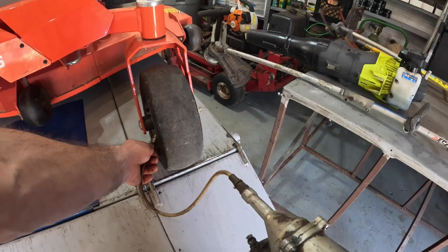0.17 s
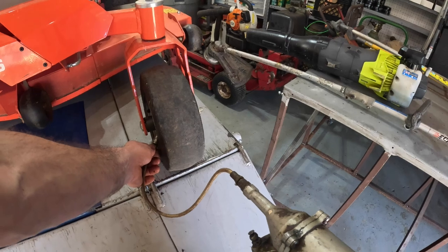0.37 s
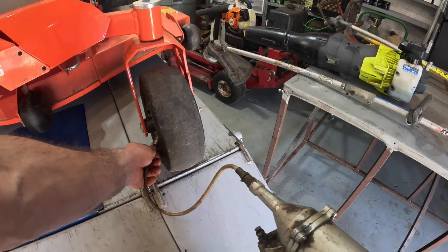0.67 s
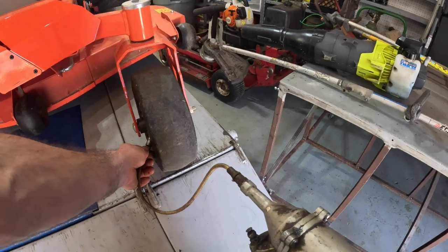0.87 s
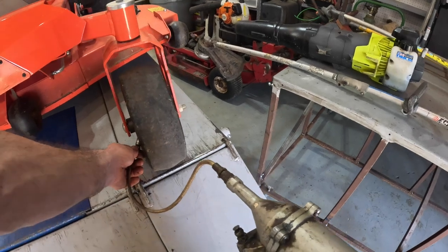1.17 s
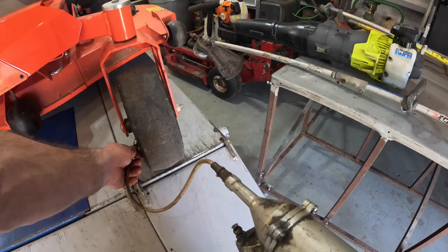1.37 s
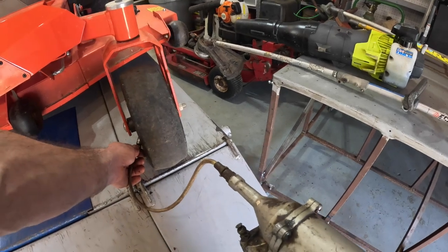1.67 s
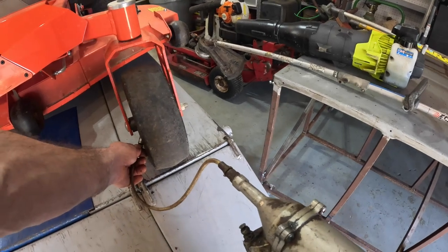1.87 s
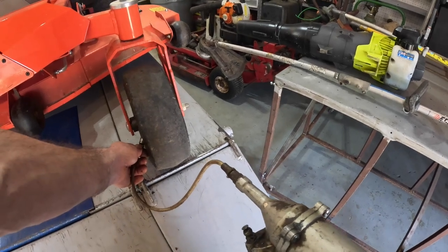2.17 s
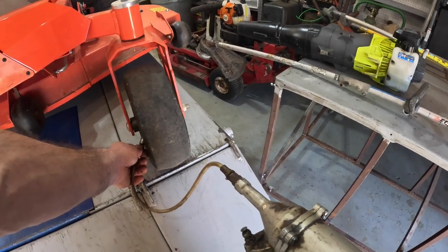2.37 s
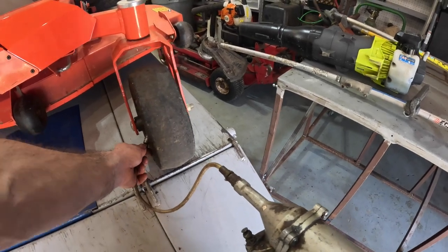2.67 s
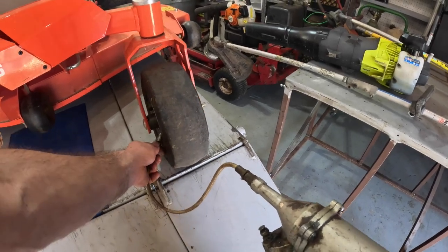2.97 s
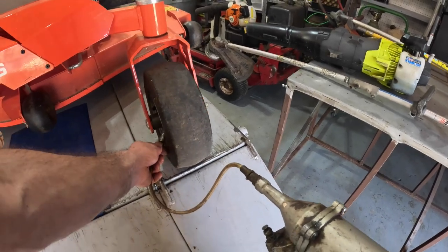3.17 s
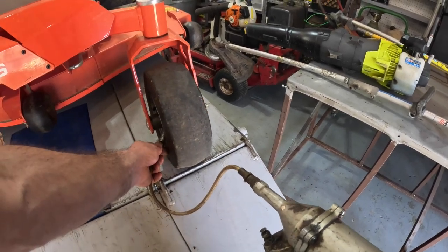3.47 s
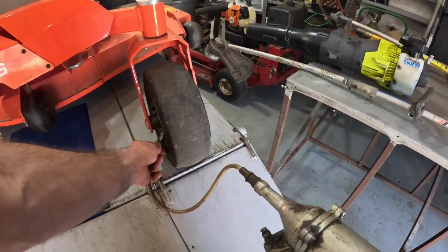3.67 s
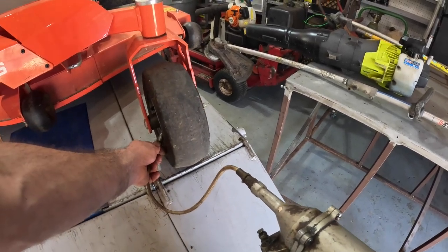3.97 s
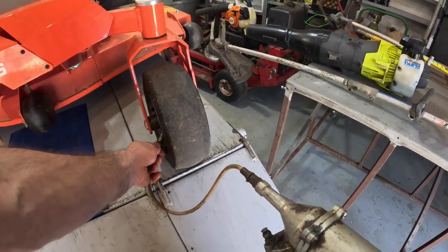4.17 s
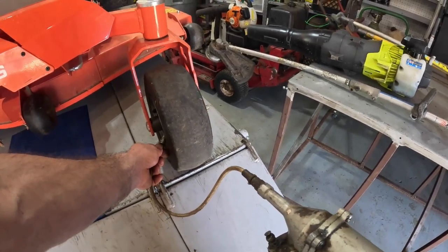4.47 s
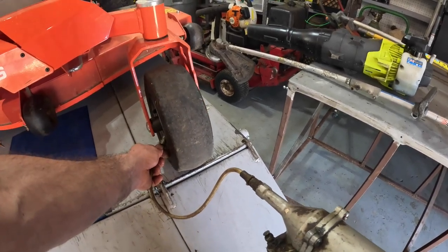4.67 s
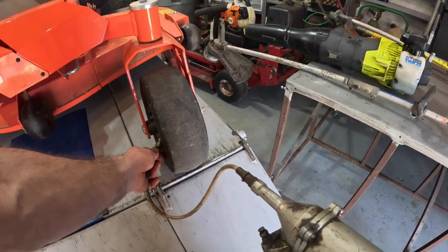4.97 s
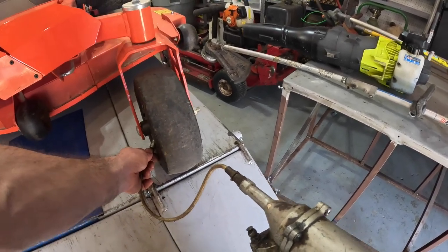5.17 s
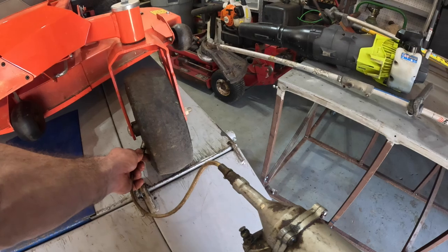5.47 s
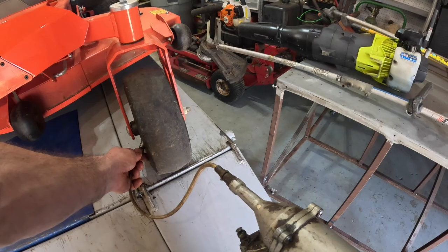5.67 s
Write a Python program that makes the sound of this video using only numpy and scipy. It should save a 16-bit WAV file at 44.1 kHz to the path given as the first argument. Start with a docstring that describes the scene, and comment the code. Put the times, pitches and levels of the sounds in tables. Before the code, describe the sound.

A pneumatic grease gun cycles about every 0.9 seconds very near the microphone. A tight clack as the piston slams home is followed roughly a third of a second later by a knocking pop and a bright, resonant hiss, sinking as pressure drops. Between strokes there is only a soft, uneven low rumble and distant motor drone. The shop adds a brief diffuse echo; the image is almost mono.

```python
"""Air-driven grease gun in a repair shop

Seven trigger pulls close by: air noise swells until the piston slams home on ringing body modes.
Each release pops and booms, then vents a resonant hiss that falls and dulls with the cylinder pressure.
The shop answers with a short echo of decaying noise, over a low rumble
built from filtered noise and a wavering motor tone."""
import sys
import numpy as np
from scipy import signal
from scipy.fft import rfft, irfft
from scipy.io import wavfile
from scipy.ndimage import uniform_filter1d

SR = 44100
rng = np.random.default_rng(int(sys.argv[2]) if len(sys.argv) > 2 else 0)


def dump_mix(stems):
    """Bounce the given channels to the path in sys.argv[1] as a 16-bit WAV at rate SR."""
    frames = np.atleast_2d(stems).T  # one column per channel
    limited = np.clip(frames, -1, 1)  # hard clip at full scale
    pcm = np.round(limited * 32767).astype(np.int16)
    wavfile.write(sys.argv[1], SR, pcm)


def field_ratio(decibels):
    """Amplitude ratio for a level in dB (20 dB per decade); scalars and array-likes work."""
    return 10 ** (np.asarray(decibels, dtype=float) / 20)


N = 256220
T = np.arange(N) / SR
OFF = -150.0  # dB, as good as silent


def on_log(hz, table):
    """Reads a (Hz, value) table on a log-frequency axis."""
    f, value = np.transpose(table)
    return np.interp(np.log(np.maximum(hz, 1)), np.log(f), value)


def noise(colour):
    """Steady noise of rms 1, coloured by a (Hz, dB) table."""
    spectrum = rfft(rng.standard_normal(N))
    x = irfft(spectrum * field_ratio(on_log(np.fft.rfftfreq(N, 1 / SR), colour)), N)
    return x / np.std(x)


def band(x, lo_hz, hi_hz):
    """Band-pass filter."""
    return signal.sosfilt(signal.butter(2, [lo_hz, hi_hz], "band", fs=SR, output="sos"), x)


def walk(rate):
    """Smooth random wander with a spread near 1: random steps, rate per second, slewed twice."""
    hold = int(SR / rate)
    steps = np.repeat(rng.standard_normal(N // hold + 1), hold)
    return 1.2 * uniform_filter1d(uniform_filter1d(steps, hold), hold)[:N]


def add(out, s, x):
    """Lays x into out from time s."""
    i = int(s * SR)
    out[i:i + len(x)] += x[:N - i]


def ring(hz, t60, lag_ms=0):
    """One decaying mode, struck after a lag."""
    t = np.maximum(np.arange(SR // 8) / SR - lag_ms / 1000, 0)
    return np.sin(2 * np.pi * hz * t) * 1000 ** (-t / t60)


# Distant motor drone, swelling and fading. Each row: time in seconds, level in dB.
DRONE_LEVEL = [(0, -57.5), (2.4, -56), (2.7, -51.5), (3.3, -47), (3.8, -39.5), (4.1, -53.5), (4.3, -51.5),
               (4.65, -44.5), (5.1, -52.5), (5.35, -51), (5.81, -47)]
# Dull low noise between the strokes, uneven in level. Each row: time in seconds, level in dB.
DULL_LEVEL = [(0, -44), (.6, -58), (1.2, -49.5), (1.5, -57.5), (2, -47), (2.5, -60.5), (3, -47.5),
              (3.4, -54.5), (4.2, -52.5), (4.65, -48.5), (5.1, -56.5), (5.81, -45)]
# Faint tone that comes up at the end. Each row: time in seconds, level in dB.
TONE_LEVEL = [(5.15, -80.5), (5.32, -53), (5.81, -52.5)]
# Colour of the dull low noise. Each row: frequency in Hz, level in dB.
DULL_COLOUR = [(65, -41), (110, -10), (188, -17.5), (271, -17.5), (326, -22.5), (776, -38), (835, -31),
               (1350, -37), (9000, -72), (11700, -112), (19800, -120)]


def rumble():
    """A deep throb, a narrow motor drone and a dull noise, all uneven in level, over a steady murmur."""
    drone_db = np.interp(T, *np.transpose(DRONE_LEVEL))
    dull_db = np.interp(T, *np.transpose(DULL_LEVEL))
    tone_db = np.interp(T, *np.transpose(TONE_LEVEL), OFF)

    deep_db = -52.5 + 5.1 * walk(5)
    deep = noise([(10, -19.5), (22, -6), (50, 1.5), (70, -20.5), (150, -77)]) * field_ratio(deep_db)

    motor_hz = 77 + 1.6 * walk(4)
    motor = np.sin(2 * np.pi * np.cumsum(motor_hz) / SR)
    motor_noise = noise([(50, -30), (66, -3), (90, -3), (115, -25.5), (300, -84)])
    drone = (motor + 0.4 * motor_noise) * field_ratio(drone_db)

    # the tone is a narrow strip of noise
    tone = noise([(200, -89.5), (255, -23.5), (270, -1.0), (285, -23.0), (360, -98)]) * field_ratio(tone_db)

    murmur = noise([(100, -24), (200, 3), (450, -4.5), (1200, -17.5), (2500, -38), (6000, -40.5),
                    (16000, -93)]) * field_ratio(-59.5)
    dull = noise(DULL_COLOUR) * field_ratio(dull_db + 1.5 * walk(34))
    return band(deep + drone + tone, 8.6, 600) + dull + murmur


# Decay of the shop. Each row: frequency in Hz, time to fall 60 dB in seconds.
ECHO_T60 = [(100, 0.51), (1000, 0.33), (4000, 0.4), (16000, 0.18)]


def echo(x, wet_db=-16, first_ms=6):
    """Diffuse answer of the shop: noise that builds up, then fades at its own rate in each octave."""
    t = np.arange(SR // 2) / SR
    tail = 0
    for hz in 110 * 2 ** np.arange(8):
        octave = band(rng.standard_normal(len(t)), hz / 1.4, hz * 1.41)
        tail = tail + octave * 1000 ** (-t / on_log(hz, ECHO_T60))
    tail = tail * np.minimum(t * 1000 / first_ms, 1) ** 2
    return field_ratio(wet_db) * signal.fftconvolve(x, tail / np.sqrt(np.sum(tail ** 2)))[:N]


# Resonances of the gun's air passages. Each row: frequency in Hz, width in Hz, lift in dB before it wanders.
PASSAGES = [(1120, 230, 3.5), (1833, 84, 5.5), (2187, 280, 3.5), (2610, 250, -5.5), (3080, 240, -1.5),
            (4494, 140, 5), (6050, 1500, 5.5), (7680, 750, 4)]
# How each range follows the flow. Each row: centre in Hz, steepness of fall as a factor on the drop in dB,
# share of the treble lift as a factor.
RANGES = [(600, 1.28, 0.55), (3560, 1.384, .2), (8000, 1.41, 1), (14000, 1.4, 0.53)]


def air(colour, drop_db, treble_db, level_db, flutter_db, wander_db=3.5):
    """Turbulent hiss in overlapping ranges, which fall at different rates as the pressure drops."""
    hz = np.fft.rfftfreq(N, 1 / SR)
    plain = noise(colour)
    # each lifted resonance waxes and wanes on its own as the flow shifts
    ridges = 0
    for centre_hz, width_hz, lift_db in PASSAGES:
        ridge = irfft(rfft(plain) / (1 + (2 * (hz - centre_hz) / width_hz) ** 2), N)
        wander = field_ratio(wander_db * walk(21) * (lift_db > 0))
        ridges = ridges + (field_ratio(lift_db) - 1) * wander * ridge
    coloured = plain + ridges
    spectrum = rfft(coloured) / np.std(coloured)

    out = 0
    for k, (_, steepness, treble_share) in enumerate(RANGES):
        # crossfade weight: 1 at this range's centre, 0 at its neighbours'
        weight = on_log(hz, [(row[0], j == k) for j, row in enumerate(RANGES)])
        range_db = steepness * drop_db + treble_share * treble_db + flutter_db * walk(150)
        out = out + irfft(spectrum * weight, N) * field_ratio(range_db)
    return field_ratio(level_db) * out


# Modes of the gun body. Each row: frequency in Hz, time to fall 60 dB in seconds, sign of the first swing,
# level in dB on a slam, lag in ms on a slam, level in dB on a pop, lag in ms on a pop.
BODY = [(50, .03, 1, -9.5, 1.6, -14, 0), (187, .024, -1, 0, .57, -12, 3), (506, .02, 1, -2.6, .16, -2, 0),
        (820, .01, -1, -8.7, .5, -6, 1), (1150, .025, 1, -22, 0, -6, 2), (1950, .02, 1, -16, 0, -8, 2.5)]


def gun_body(on_pop):
    """The gun body rings in a few short modes, balanced differently for a pop and a slam."""
    out = 0
    for hz, t60, sign, slam_db, slam_lag_ms, pop_db, pop_lag_ms in BODY:
        db, lag_ms = (pop_db, pop_lag_ms) if on_pop else (slam_db, slam_lag_ms)
        out = out + sign * field_ratio(db) * ring(hz, t60, lag_ms)
    return out


# Trigger releases. Each row: start in seconds, pop level in dB, boom level in dB, air level in dB,
# treble lift in dB, end of full flow in ms, hiss cut-off in ms, both after the start.
VENTS = [(0.3416, -15, -20.5, -17, -3, 49, 213), (1.2199, -13, -17.5, -17.5, -2, 57, 233),
         (2.051, -13, -20, -19.5, -1, 63.6, 225), (3.066, -13, -18, -19.5, 0.5, 61.4, 226),
         (3.895, -13, -20, -18.5, 0.5, 38, 223), (4.7644, -13, -19.5, -17.5, -0.5, 43, 232),
         (5.7527, -9.5, -18.5, -18.5, -1, 57, 240)]
# The exhaust port whistles for a moment. Each row: centre in seconds, frequency in Hz, peak level in dB,
# time from the peak down to 1/e in ms.
WHISTLES = [(3.951, 1850, -13.5, 9), (4.824, 1850, -17, 7)]
# The returning piston knocks just after each release. Each row: start in seconds, frequency in Hz, level in dB.
KNOCKS = [(.3472, 2050, -11), (1.2243, 1900, -11), (2.056, 2000, -8.5), (3.0683, 1900, -8),
          (3.8985, 2100, -13), (4.7678, 1000, -8), (5.7557, 700, -8)]
# Boom of the emptying cylinder. Each row: frequency in Hz, time to fall 60 dB in seconds,
# level in dB relative to the release's boom.
CYLINDER = [(61, .13, 1), (116, 0.048, -4)]
# Colour of the vented air. Each row: frequency in Hz, level in dB.
VENT_COLOUR = [(35, -40.5), (60, -6.5), (607, -4), (1200, -5.5), (1410, -9), (1860, -3), (2580, -3.5),
               (3270, 0.5), (3940, -5.5), (7570, -8.5), (10000, -13.5), (14600, -15.5), (16000, -31.5)]


def vents():
    """A pop, a low boom and buffet, then the hiss falls with the cylinder pressure until it cuts off."""
    # whenever the fall starts, the pressure has sunk this far by this time
    empty_ms, empty_db = 335.7, -31.5
    vent_level_db = np.full(N, OFF)
    drop_db, treble_lift_db, buffet, hits = np.zeros((4, N))
    for s, pop_db, boom_db, air_db, treble_db, full_ms, cut_ms in VENTS:
        t = (T - s) * 1000  # ms
        shape_db = np.interp(t, [0, 2.5, 12, cut_ms, cut_ms + 40], [-3.5, -9.5, 1.0, 5.5, -4.5], OFF, OFF)
        vent_level_db = np.maximum(vent_level_db, air_db + shape_db)
        drop_db += np.interp(t, [0, full_ms, empty_ms], [0, -1.5, empty_db], 0, 0)
        treble_lift_db += treble_db * (t >= 0) * (t < empty_ms)
        # rough buffet over the boom
        buffet_db = -2.5 + np.interp(t, [0, 5, 22, 60], [-14.5, -0.5, -8, -30.5], OFF, OFF)
        buffet += field_ratio(boom_db + buffet_db)
        add(hits, s, field_ratio(pop_db) * gun_body(on_pop=True))
        # the emptying cylinder sucks in (minus sign), then swings back
        for hz, t60, db in CYLINDER:
            add(hits, s, -field_ratio(boom_db + db) * ring(hz, t60, 3.3))
    for s, hz, db, ms in WHISTLES:
        swell = np.exp(-((T - s) * 1000 / ms) ** 2)
        hits += field_ratio(db) * np.sin(2 * np.pi * hz * T) * swell
    for s, hz, db in KNOCKS:
        add(hits, s, field_ratio(db) * ring(hz, 0.011))
    low = noise([(60, -17.0), (120, 3.0), (250, -7), (500, -6), (1000, -25), (4000, -88)])
    hiss = air(VENT_COLOUR, drop_db, treble_lift_db, vent_level_db, flutter_db=0.9)
    return hiss + buffet * low + hits


# Trigger pulls. Each row: slam in seconds, lead of the first leak before the slam in ms, air level in dB,
# slam level in dB, crack level in dB.
PULLS = [(0.0513, 22, -21, -10.5, -7), (0.9056, 24.5, -21, -10, -8.5), (1.7689, 27.5, -21, -9, -8.5),
         (2.7548, 25.5, -20.5, -8.5, -6.5), (3.5892, 27, -19.5, -11.5, -7.5),
         (4.4527, 27.7, -20.5, -9.5, -7), (5.4636, 26.5, -20, -10, -6.5)]
# Colour of the air filling the cylinder. Each row: frequency in Hz, level in dB.
FILL_COLOUR = [(59, -32), (100, -1.5), (818, -3.5), (1870, -2.5), (2630, -9.5), (3320, -6), (4020, -6.5),
               (15000, -21), (16000, -27.5)]
# Colour of the thin hiss after the slam. Each row: frequency in Hz, level in dB.
THIN_COLOUR = [(59, -51), (100, -12.5), (277, -2), (381, -6), (513, -1.5), (752, -5), (1800, -8.5),
               (2080, -14), (2630, 1.5), (4470, -5.5), (8280, -13), (13200, -22), (16000, -34.5)]


def pulls():
    """Air fills the cylinder, the piston cracks and slams home, a thin hiss runs on, then drops abruptly."""
    stroke_ms, crack_lead_ms = 22.3, 2.1  # valve bump (at most) and crack, each ahead of the slam
    leak_db, open_db, choke_db = -11, -3, -6  # air under full rush: leaking, after the bump, at the slam
    thin_db, thin_ms = -35, 130.7  # thin hiss after the slam
    fill_level_db, thin_level_db = np.full((2, N), OFF)
    fade_db, hits = np.zeros((2, N))
    for s, leak_ms, air_db, slam_db, crack_db in PULLS:
        t = (T - s) * 1000  # ms
        bump_ms = min(stroke_ms, leak_ms - 1.5)
        # air leaks past the valve, swells once it bumps open, and chokes as the piston lands
        rush_db = np.interp(t, [-leak_ms - 2, -leak_ms, -bump_ms, 2.5 - bump_ms, -9, -crack_lead_ms, 0, 3],
                            [-28, leak_db, leak_db, open_db, 0, 0, choke_db, -16], OFF, OFF)
        fill_level_db = np.maximum(fill_level_db, air_db + rush_db)
        hold_db = np.interp(t, [0, thin_ms, thin_ms + 15], [0, 0, -16], OFF, OFF)
        thin_level_db = np.maximum(thin_level_db, thin_db + hold_db)
        fade_db += np.interp(t, [0, 25, thin_ms + 15], [4, 0, -7], 0, 0)

        add(hits, s, field_ratio(slam_db) * gun_body(on_pop=False))
        crack = ring(1900, 0.006) + 0.5 * ring(5500, 0.004)
        add(hits, s - crack_lead_ms / 1000, field_ratio(crack_db) * crack)
        add(hits, s - bump_ms / 1000, field_ratio(slam_db - 5) * ring(190, 0.016))  # valve bump
        add(hits, s - leak_ms / 1000, field_ratio(slam_db - 14) * ring(230, 0.014))  # first leak
        # a faint tick as the hiss ends
        tick = sum(ring(hz * rng.uniform(0.8, 1.2), 0.014, rng.uniform(0, 5)) for hz in (800, 1150, 1950, 3300))
        add(hits, s + (thin_ms - 3) / 1000, field_ratio(thin_db - 3) * tick)
    rush = air(FILL_COLOUR, 0, 0, fill_level_db, flutter_db=2.4)
    # the lumpy rush rings the inlet in a broad band
    inlet = band(rush, 2400, 3900)
    thin_hiss = air(THIN_COLOUR, fade_db, 0, thin_level_db, flutter_db=0.99)
    return rush + inlet + thin_hiss + hits


def scene():
    """The gun, its echo and the rumble, alike at both microphones."""
    gun = pulls() + vents()
    mid = gun + echo(gun) + rumble()
    return np.array([mid, mid])


def band_limit(x):
    """A steep low-pass at the top of the band."""
    return signal.sosfilt(signal.butter(12, 16870, fs=SR, output="sos"), x)


# Spread between the microphone ports. Each row: frequency in Hz, gain of the side signal in dB.
SIDE_GAIN = [(60, -37), (700, -36), (1500, -40.5), (8000, -27.5), (10500, -22.5), (11500, -0.5), (16000, 0)]


def record(dry):
    """Two close microphone ports part mainly in the top treble, the left a little brighter."""
    top_end = signal.ellip(8, 0.2, 70, 16000, fs=SR, output="sos")  # low-pass at 16 kHz
    mid = signal.sosfilt(top_end, dry.mean(axis=0))
    size = 2048
    scatter = rng.standard_normal(size) * np.exp(-np.arange(size) / SR / 0.02)
    scattered = signal.fftconvolve(mid, scatter / np.sqrt(np.sum(scatter ** 2)))[:N]
    gain = field_ratio(on_log(np.fft.rfftfreq(N, 1 / SR), SIDE_GAIN))
    # the share of plain mid favours the left
    side = irfft(rfft(scattered + 0.38 * mid) * gain, N)
    return band_limit(np.array([mid + side, mid - side]))


dry = scene()
out = record(dry)
dump_mix(out)
```